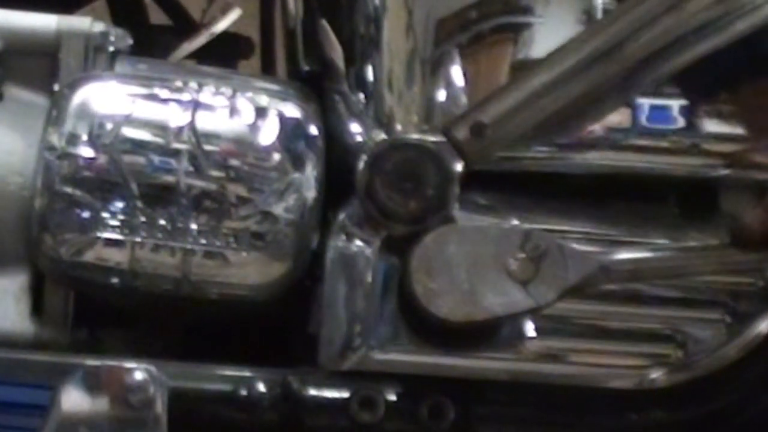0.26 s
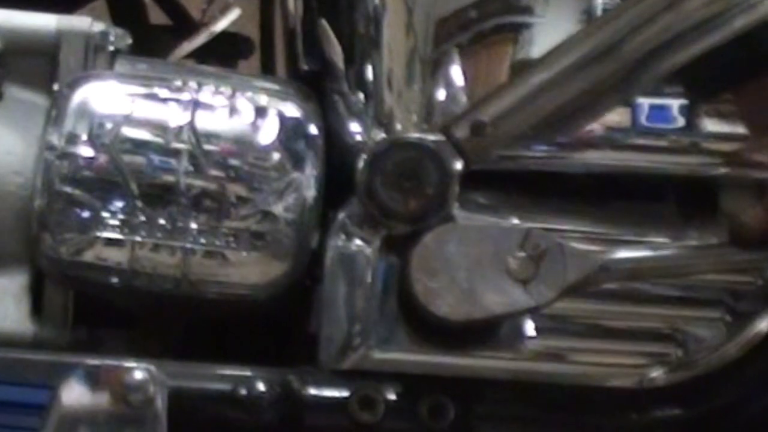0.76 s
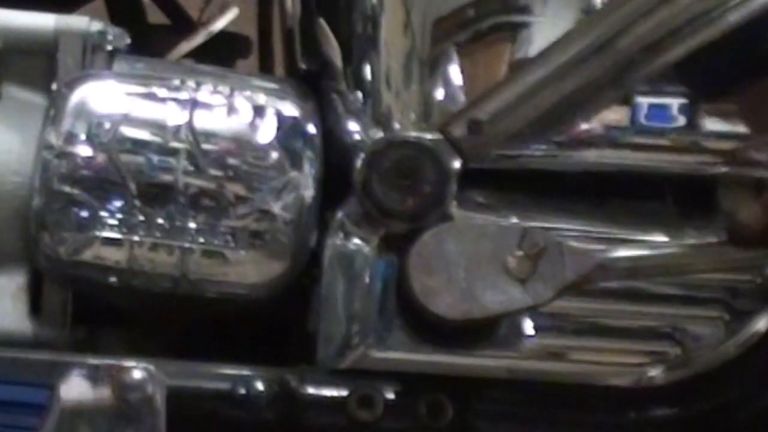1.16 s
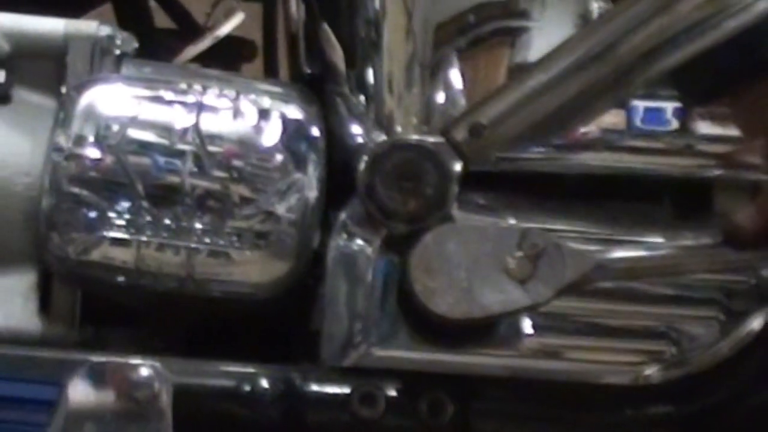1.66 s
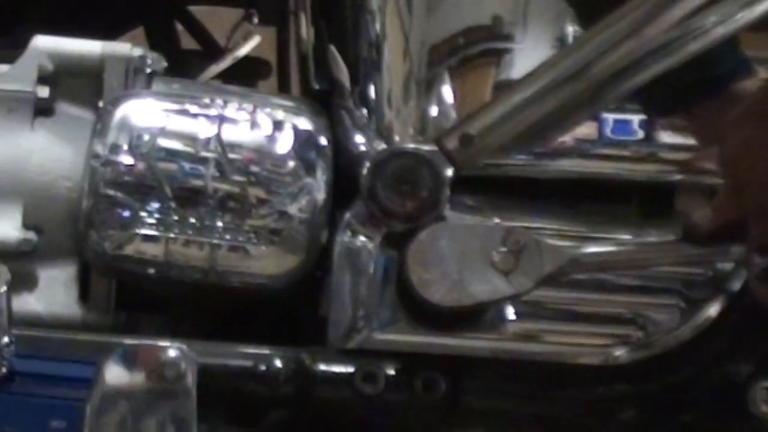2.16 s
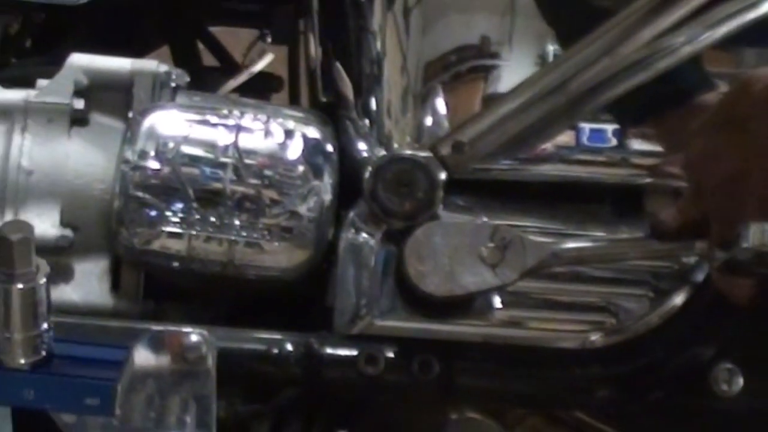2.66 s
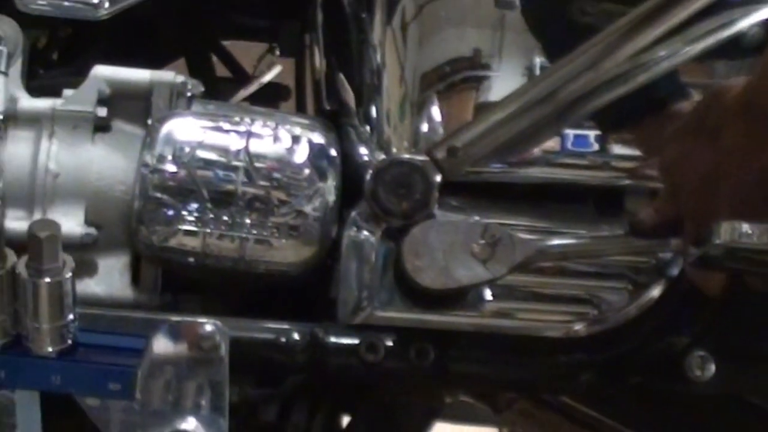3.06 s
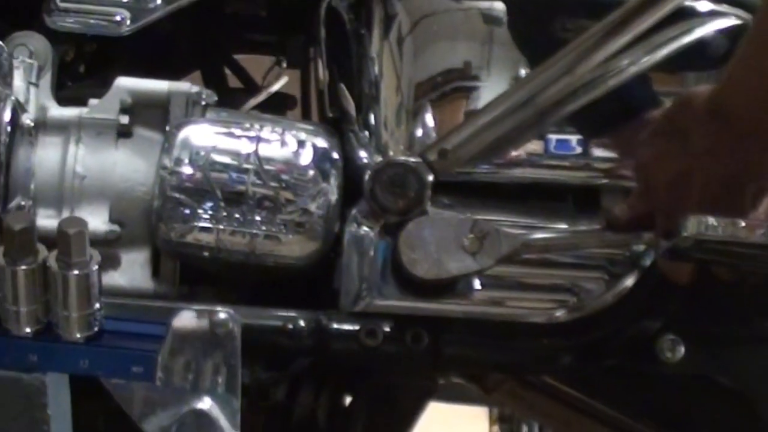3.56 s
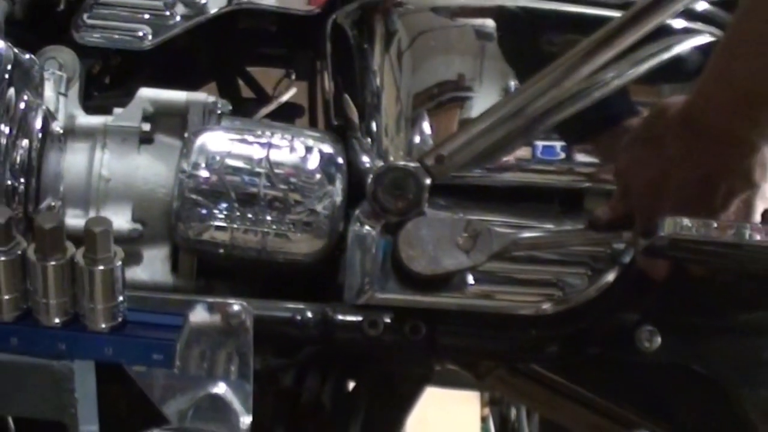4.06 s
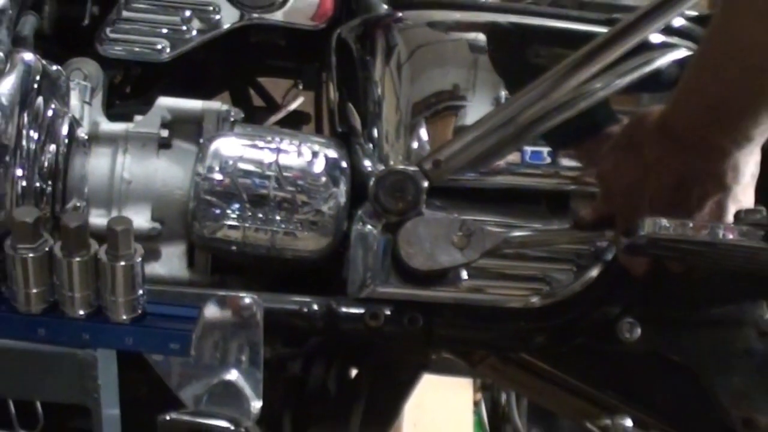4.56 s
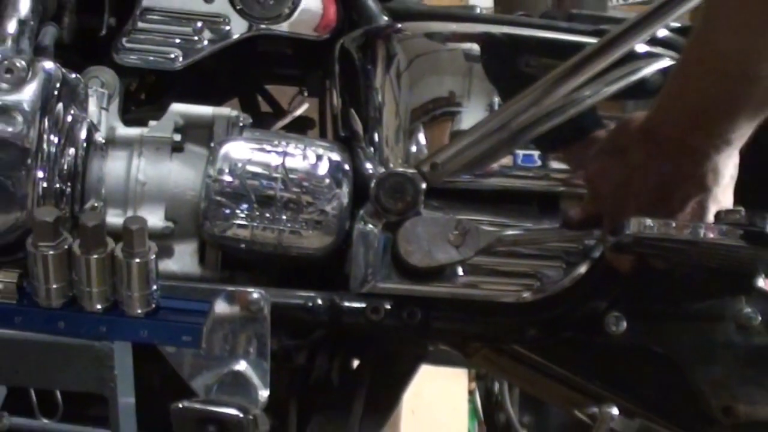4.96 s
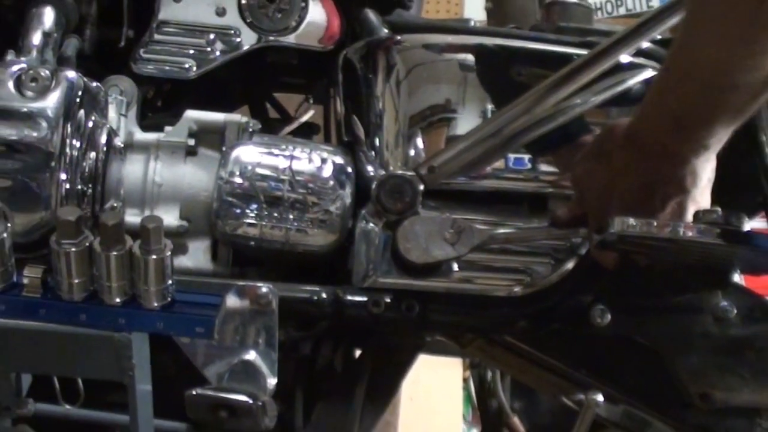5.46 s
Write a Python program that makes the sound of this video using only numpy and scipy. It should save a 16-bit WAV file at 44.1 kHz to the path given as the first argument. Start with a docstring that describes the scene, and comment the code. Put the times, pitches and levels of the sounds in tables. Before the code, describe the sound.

Sharp close wrench clicks ring briefly in a garage, between duller return clacks, light socket scrapes and tiny ticks over quiet hum and hiss.

```python
"""A faint fan hum and a brief rub of steel open the scene; a click-type torque wrench then snaps, bright and close.
It tightens a nut on a motorcycle in a small garage, near a microphone with two close ports. Three times it
trips; twice it snaps back, duller, as the hand eases, and then rubs on the nut. Snaps are noise clatters with
ringing modes and a garage tail; rubs, a groan and ticks are contact forces sent through resonances.
The hum is wavering tones over filtered hiss, and a fast limiter flattens the head of every snap."""
import sys
import numpy as np
from scipy import signal
from scipy.fft import rfft, irfft
from scipy.io import wavfile
from scipy.ndimage import uniform_filter1d, minimum_filter1d

SR = 44100
rng = np.random.default_rng(int(sys.argv[2]) if len(sys.argv) > 2 else 0)


def unload_wav(signal):
    """Save mono or channel-first audio to the path in sys.argv[1] as 16-bit WAV at rate SR, clipped to [-1, 1]."""
    wavfile.write(
        sys.argv[1],
        SR,
        np.round(np.clip(np.atleast_2d(signal).T, -1, 1) * 32767).astype(np.int16),
    )


N = 252472  # length in samples

# Air of the still garage and microphone hiss. Each row: frequency in Hz, relative density in dB.
AIR_SPECTRUM = [(25, -36), (50, -21.5), (120, -19.5), (170, -9.5), (250, -16), (360, -12.5), (500, -20.5),
                (750, -21), (1100, -25.5), (3000, -29), (8600, -31), (16000, -31.5)]
AIR_DB = -56.5  # rms of the air above 300 Hz, common to both ports
# Mains and fan tones and a faint electronic whine. Each row: frequency in Hz, level in dB, rms waver in Hz.
HUM_TONES = [(118, -73.5, 0.38), (163.2, -57.5, 1.75), (238.6, -66.5, 2.03), (8530, -73.5, 1.6)]
# Port difference for the diffuse room noise. Each row: frequency in Hz, side level in dB.
AIR_PORT_SIDE = [(60, -19), (150, -14.5), (380, -8), (950, 1), (2400, -2.5), (6000, -7), (12000, -18.5)]
# Port difference for near sounds. Each row: frequency in Hz, side level in dB.
NEAR_PORT_SIDE = [(150, -19), (350, -18), (600, -12.5), (4500, -12), (8000, -14), (12000, -22)]

# The socket rubs on the nut as the handle swings. Each row: start in seconds, length in seconds, relative level in dB.
HANDLE_SWINGS = [(0, 0.18, -54.5), (1.125, 0.2, -52), (1.41, 0.19, -60), (1.61, 0.15, -58.5),
                 (1.9, 0.11, -62), (3.553, 0.97, -48), (4.77, 0.097, -60)]
# A swing gets going, slows steadily and stops.
SWING_ATTACK_S, SWING_SAG_DB_PER_S, SWING_RELEASE_S = 0.045, 11, 0.064
# The socket groans once as it unloads, at the head of the long swing.
GROAN_START_S, GROAN_LENGTH_S, GROAN_DB, GROAN_SAG_DB_PER_S = 3.58, 0.33, -47.5, 32
# Small ticks of the socket and handle. Each row: time in seconds, relative level in dB.
HANDLE_TICKS = [(2.156, -40), (2.1758, -49.5), (2.2023, -38), (2.6878, -37.5), (4.348, -36), (4.4378, -44),
                (4.864, -40), (5.675, -40.5)]
# Resonances of socket and handle. Each row: frequency in Hz, width in Hz, relative level in dB.
SOCKET_RESONANCES = [(740, 400, 13), (2010, 470, 8), (2700, 1700, 0), (4000, 1100, -7), (5870, 1500, 6),
                     (7400, 400, -20), (8100, 770, 0), (11100, 1100, -5)]

# The wrench trips at its set torque. Each row: start in seconds, relative strength in dB,
# brightness in dB per octave, lingering note in dB relative to the other modes' 0 dB.
WRENCH_TRIPS = [(0.1936, 1.5, 0.5, -32.5), (2.9815, 0, 1, -28), (5.1068, 0, 1.16, -40.5)]
# The wrench snaps back. Each row: start in seconds, relative strength in dB,
# brightness in dB per octave, lingering note in dB relative to the other modes' 0 dB.
WRENCH_RESETS = [(0.879, 1, -0.6, -54), (3.4932, 1.5, -0.04, -53)]
# Broad colour of a trip. Each row: frequency in Hz, relative level in dB.
TRIP_SPECTRUM = [(60, -16.5), (190, -13), (280, 5), (480, 5), (680, 0), (1000, 3.5), (1750, -2.5),
                 (2300, 0.5), (3400, -4), (4500, 5), (5900, -0.5), (7000, 7), (9000, -5.5), (11900, -3.5),
                 (12900, -11), (13750, -3), (14500, -20)]
# Broad colour of a snap back. Each row: frequency in Hz, relative level in dB.
RESET_SPECTRUM = [(60, -21), (190, -21), (285, 7), (480, -5), (680, -8), (1200, -0.5), (2100, -4.5),
                  (3400, -9), (4500, -8), (7000, -10.5), (9300, -18), (10350, -10), (11200, -16.5),
                  (15500, -30)]
# Broad resonances of the tripped wrench. Each row: frequency in Hz, height of the hump in dB.
TRIP_HUMPS = [(1637, 8.5), (2048, 7.5), (2251, 6), (2641, 7), (2772, 2.5), (3071, 4.5), (4072, 2),
              (4229, 2), (4524, 1.5), (4960, 2.5), (5182, 0.5), (5542, 3), (5686, 5), (6949, -0.5),
              (7076, 6.5), (7283, -2), (7698, -11.5), (8306, 5)]
# Broad resonances of the resting wrench. Each row: frequency in Hz, height of the hump in dB.
RESET_HUMPS = [(1516, 2.5), (1979, 6.4), (2259, 3.7), (2555, 6.6), (3080, 7.9), (4232, 6.2), (4590, 6.4),
               (5309, 3.2), (5427, 3.5), (5948, 11.5), (6106, 1.9), (6847, 7.7), (7045, 3.4), (7202, 1.7),
               (7322, 3.3), (7672, 3.5), (7928, 3.3), (8729, 10.5)]
# Ringing of the tripped steel. Each row: frequency in Hz, relative level in dB, 60 dB decay in seconds.
TRIP_RINGING = [(2080, -25.5, 0.05), (2240, -30.5, 0.61), (4200, -11.5, 0.041), (4200, -30.5, 0.62),
                (4500, -15.5, 0.33), (5080, -12, 0.014), (5200, -18.5, 0.39), (5500, -20, 0.2),
                (6470, -26.5, 0.46), (6870, -23, 0.27), (6800, -18.5, 0.47), (7190, -18.5, 0.39),
                (7300, -46, 0.37), (9930, -12, 0.31), (10700, 1, 0.024), (11800, -4, 0.026),
                (13700, -1, 0.012)]
# Ringing of the steel at rest. Each row: frequency in Hz, relative level in dB, 60 dB decay in seconds.
RESET_RINGING = [(1500, -9, 0.027), (1950, -31.5, 0.5), (2480, -44, 0.74), (4310, -56, 0.23),
                 (4600, -18.5, 0.068), (5980, -13, 0.033), (9950, -32.5, 0.23), (10220, -14.5, 0.072)]
# Close sound relative to what fills the room. Each row: frequency in Hz, relative level in dB.
NEAR_SPECTRUM = [(100, -26), (650, -46), (1250, -3.5), (3000, 0), (8000, 4), (11500, 7), (15500, 11)]

# Garage decay. Each row: frequency in Hz, 60 dB decay in seconds.
GARAGE_DECAY = [(100, 1), (300, 0.45), (1000, 0.45), (2300, 0.48), (4500, .5), (7000, 0.42), (10000, 0.39),
                (15000, 0.19)]
# Clusters of reflections from floor, bike and walls. Each row: delay in seconds, level in dB over the diffuse tail.
REFLECTIONS = [(.010, 6.5), (0.019, 9), (0.029, -11), (0.052, 7.5), (.098, -22)]
# Standing waves between bike, lift and walls. Each row: frequency in Hz, relative level in dB,
# 60 dB decay in seconds.
STANDING_WAVES = [(264.3, 0, 0.21), (292.6, -4, 0.13), (327.3, 3.5, 0.39), (385.5, -2, 0.29),
                  (482, -9.5, 0.87), (518, 5, 0.33), (775, 9.5, 0.32), (831, 0, 0.52), (894, -6.5, 0.77),
                  (980, 5.5, 0.39), (1043, 6, 0.33), (1110, -19, 0.2), (1219, -2.5, 0.45), (1376, 6, 0.31)]
EDGE_HZ = 15800  # upper band limit


def amp(db):
    """Decibels to gain."""
    return 10 ** (np.asarray(db) / 20)


def unit(x):
    """Scales to rms 1."""
    return x / np.sqrt(np.mean(x ** 2) + 1e-20)


def read(points, hz):
    """Reads a table on a log-frequency axis."""
    f, value = np.transpose(points)
    return np.interp(np.log(hz + 1), np.log(f + 1), value)


def add(mix, s, sound):
    """Mixes a sound in at time s, cut off at the end of the mix."""
    part = mix[..., round(s * SR):][..., :sound.shape[-1]]
    part += sound[..., :part.shape[-1]]


def freqs(size):
    """Frequencies of a spectrum of size samples."""
    return np.fft.rfftfreq(size, 1 / SR)


def drift(rate_hz):
    """Slow random wander of rms 1: noise low-passed at the given rate."""
    lowpass = 1 + (freqs(N) / rate_hz) ** 4
    return unit(irfft(rfft(rng.standard_normal(N)) / lowpass, N))


def colour(x, points, tilt_db=0, size=4096):
    """Causal minimum-phase filter with the given spectrum, tilted about the mid treble."""
    hz = abs(np.fft.fftfreq(size, 1 / SR))
    tilt = tilt_db * np.log2((hz + 200) / 4000)
    log_gain = np.log(amp(read(points, hz) + tilt))
    spectrum = np.exp(np.conj(signal.hilbert(log_gain)))
    taps = np.fft.ifft(spectrum).real[:size // 2]
    return signal.fftconvolve(x, taps)[:len(x)]


def ports(middle, side, side_db=NEAR_PORT_SIDE):
    """Two close microphone ports share the middle and take the filtered side with opposite signs."""
    side_gain = amp(read(side_db, freqs(len(side))))
    side = irfft(rfft(side) * side_gain, len(side))
    return np.array([middle + side, middle - side])


def background(flutter=0.2):
    """Soft room noise and hiss under the hum of a fan: tones that waver in pitch and level."""
    hz = freqs(N)
    z = rfft(rng.standard_normal((2, N))) * amp(read(AIR_SPECTRUM, hz))
    z = z / np.std(irfft(z[0] * (hz > 300), N))
    air = amp(AIR_DB) * ports(*irfft(z, N), AIR_PORT_SIDE)
    hum = np.zeros(N)
    for f, db, waver_hz in HUM_TONES:
        phase = 2 * np.pi * np.cumsum(f + waver_hz * drift(6.2)) / SR
        level = 1 + flutter * drift(2.2)
        hum += amp(db) * unit(np.sin(phase) * level)
    return air + hum


def stroke(start, length, db, sag_db_per_s):
    """Gain of one sliding movement: it rises, sags as the hand slows, and is released."""
    t = np.arange(N) / SR - start
    attack = np.clip(t / SWING_ATTACK_S, 0, 1)
    release = np.clip((length - t) / SWING_RELEASE_S, 0, 1)
    return attack * release * amp(db - sag_db_per_s * np.clip(t, 0, length))


def resonances(x, modes):
    """Sends a contact force through parallel resonances given as (Hz, width Hz, dB)."""
    hz = freqs(N)
    body = sum(amp(db) / (1 + 1j * (hz ** 2 - f ** 2) / (width * hz + 1e-9)) for f, width, db in modes)
    return irfft(rfft(x) * body, N)


def clatter(seconds, shape=1, size=8192, count=3):
    """Steel chattering on steel: energy 1, a fairly even spectrum; a high shape holds on, then stops."""
    envelope = np.exp(-(np.arange(size) / SR / seconds) ** shape) + 1e-9
    burst = rng.standard_normal(size) * envelope
    for _ in range(count):  # flatten the spectrum, then shorten the burst again
        z = rfft(burst)
        burst = irfft(z / (abs(z) + 1e-12)) * envelope ** .3
    return burst / np.linalg.norm(burst)


def handling(room, grains_per_s=3500, grain_db=0.5, rub_db=-1.5, unsteady_db=2.0, tick_db=13, wet_db=-5):
    """Tiny slips of the socket merge into an unsteady rub and a short groan; a few larger ones tick."""
    slip_size = amp(grain_db * np.minimum(rng.exponential(1, N), 4))
    slipping = rng.random(N) < grains_per_s / SR
    slips = rng.standard_normal(N) * slip_size * slipping

    swinging = sum(stroke(*row, SWING_SAG_DB_PER_S) for row in HANDLE_SWINGS)
    unsteady = amp(rub_db + unsteady_db * drift(8.4))
    rub = unit(resonances(slips, SOCKET_RESONANCES)) * unsteady * swinging

    groan_modes = [(685, 42, 13), (760, 70, -5), (1930, 72, -3.0), (2650, 140, -11)]
    unloading = stroke(GROAN_START_S, GROAN_LENGTH_S, GROAN_DB, GROAN_SAG_DB_PER_S)
    groan = unit(resonances(slips, groan_modes)) * unloading

    knocks = np.zeros(N)
    for s, db in HANDLE_TICKS:
        add(knocks, s, amp(db + tick_db) * clatter(0.0026))
    ticks = resonances(knocks, [(2460, 1100, 5.5), (5770, 1100, 7.0), (8500, 550, -2)])

    near = colour(rub + groan + ticks, [(11500, -1.0), (13000, -13)])
    return near + amp(wet_db) * signal.fftconvolve(near[None], room, axes=1)[:, :N]


def peaked(spectrum, peaks, width_hz=65, valley_db=-1.5):
    """A smooth spectrum with resonant humps on it, as a dense table of Hz and dB."""
    hz = freqs(4096)
    humps = sum(db / (1 + ((hz - f) / width_hz) ** 2) for f, db in peaks)
    return np.transpose([hz, read(spectrum, hz) + humps + valley_db])


def ring(modes, flutter=0, flutter_hz=35):
    """Struck modes, each dying at its own speed; reflections beat with them and make them flutter."""
    t = np.arange(2 * SR) / SR
    knots = np.arange(0, 2, 1 / (2 * flutter_hz))
    wander = rng.standard_normal((len(modes), 2, SR // 32))[..., :len(knots)]
    out = np.zeros(len(t))
    for (hz, db, t60), (a, b) in zip(modes, wander):
        beat = (1 + flutter * np.interp(t, knots, a + 1j * b)) / np.sqrt(1 + flutter ** 2)
        decay = np.exp(-np.log(1000) * t / t60)
        tone = np.exp(2j * np.pi * (hz * t + rng.random()))
        out += decay * amp(db) * (beat * tone).imag
    return out


def garage(bass_rise=0.0066, treble_rise=0.0011, echo_width=0.00051, modes_db=-55, patchy_db=2.0, size=256):
    """A patchy tail that builds up (times in s), swells with each reflection cluster and dies band by band."""
    noise = rng.standard_normal((2, SR))
    # even out the noise spectrum in long frames, then shape it in short ones
    _, _, z = signal.stft(noise, SR, nperseg=16 * size)
    noise = signal.istft(z / (abs(z) + 1e-12), SR, nperseg=16 * size)[1][:, :SR]
    hz, t, z = signal.stft(noise, SR, nperseg=size)
    rise = read([(400, bass_rise), (3000, treble_rise)], hz)[:, None]
    build_up = 1 - np.exp(-t / rise)
    decay = np.exp(-np.log(1000) * t / read(GARAGE_DECAY, hz)[:, None])
    # shelves and clutter return the sound in uneven clumps
    patches = uniform_filter1d(rng.standard_normal(z.shape[1:]), size=3, axis=0)
    patches = unit(uniform_filter1d(patches, size=3, axis=1))
    z = z * amp(patchy_db * patches) * build_up * decay
    tail = signal.istft(z, SR, nperseg=size)[1][:, :SR]

    t = np.arange(SR) / SR
    swells = sum(amp(db) ** 2 * np.exp(-((t - s) / echo_width) ** 2) for s, db in REFLECTIONS)
    tail = tail * np.sqrt(1 + swells)
    middle, side = tail / np.linalg.norm(tail[0])
    standing = amp(modes_db) * ring(STANDING_WAVES)[:SR] * (1 - np.exp(-t / bass_rise))
    return ports(middle + standing, side)


def snaps(rows, spectrum, modes, note_hz, note_t60, room, chatter, shape, near_db, room_db, ring_db, flutter=0.6):
    """Each snap is a short clatter, heard near and through the room; the steel rings, and one thin note lingers."""
    out = np.zeros((2, N))
    for s, db, tilt_db, note_db in rows:
        blow = amp(db) * colour(clatter(chatter, shape), spectrum, tilt_db)
        add(out, s, amp(near_db) * colour(blow, NEAR_SPECTRUM))
        add(out, s, amp(room_db) * signal.fftconvolve(blow[None], room, axes=1))
        struck = list(modes) + [(note_hz, note_db, note_t60)]
        ringing = ports(ring(struck, flutter), ring(struck, flutter))
        add(out, s, amp(db + ring_db) * ringing)
    return out


def scene():
    """Wrench, handling and background in one garage, the first port slightly the louder."""
    room = garage()
    trips = snaps(WRENCH_TRIPS, peaked(TRIP_SPECTRUM, TRIP_HUMPS), TRIP_RINGING,
                  note_hz=7290, note_t60=0.97, room=room, chatter=0.00258, shape=1.38,
                  near_db=10.5, room_db=21.5, ring_db=-3.5)
    resets = snaps(WRENCH_RESETS, peaked(RESET_SPECTRUM, RESET_HUMPS), RESET_RINGING,
                   note_hz=7300, note_t60=2.8, room=room, chatter=0.00964, shape=6.1,
                   near_db=25.5, room_db=18.5, ring_db=-2.5)
    port_balance = amp([[.2], [-.2]])
    return (trips + resets + handling(room) + background()) * port_balance


def record(dry, ceiling_db=-15.0, release_db_per_s=2200, window=0.00075, lookahead=0.00095, sense_hz=9000):
    """A fast limiter (times in s), less sensitive to high treble, holds the snaps down; then the band limit."""
    sensed = signal.lfilter(*signal.butter(2, min(sense_hz, SR / 2 - 1), fs=SR), dry)
    power = uniform_filter1d((sensed ** 2).mean(0), max(int(window * SR), 1))
    over_db = np.maximum(10 * np.log10(abs(power) + 1e-12) - ceiling_db, 0)
    # the reduction rises at once and falls back at a steady rate
    fall = np.arange(N) / SR * release_db_per_s
    held_db = np.maximum.accumulate(over_db + fall) - fall
    span = max(int(lookahead * SR), 1)
    gain_db = uniform_filter1d(minimum_filter1d(-held_db, span), span)
    limited = dry * amp(gain_db)
    lowpass = signal.firwin(255, EDGE_HZ, window=("kaiser", 8), fs=SR)
    return signal.oaconvolve(limited, lowpass[None], "same", axes=1)


dry = scene()
out = record(dry)
unload_wav(out)
```